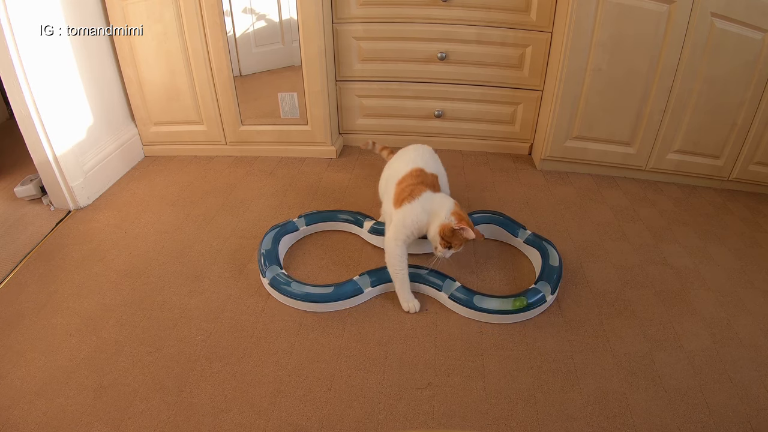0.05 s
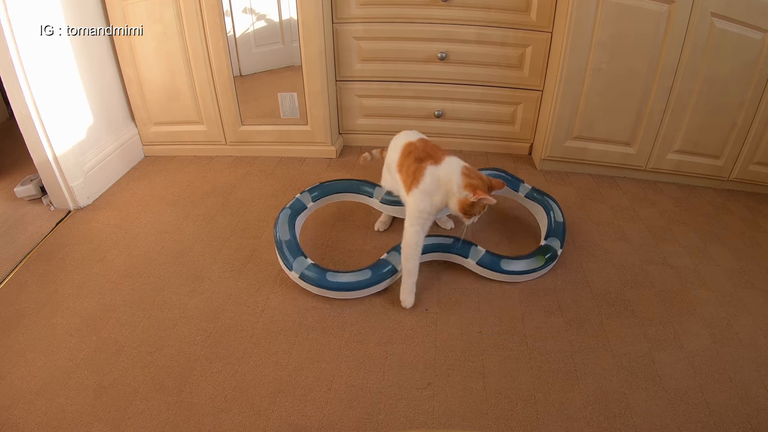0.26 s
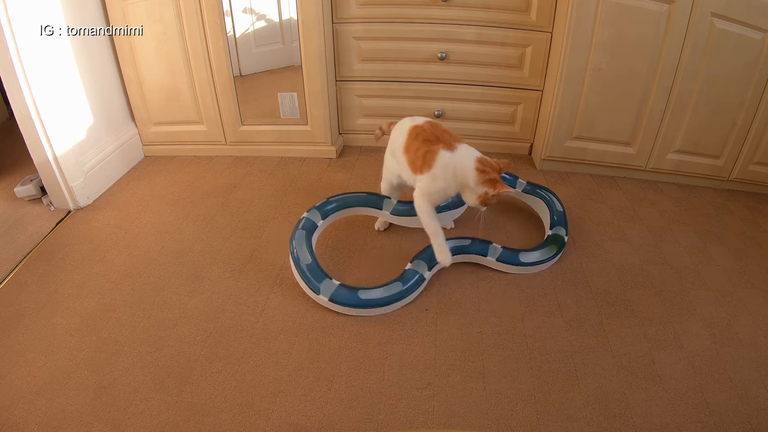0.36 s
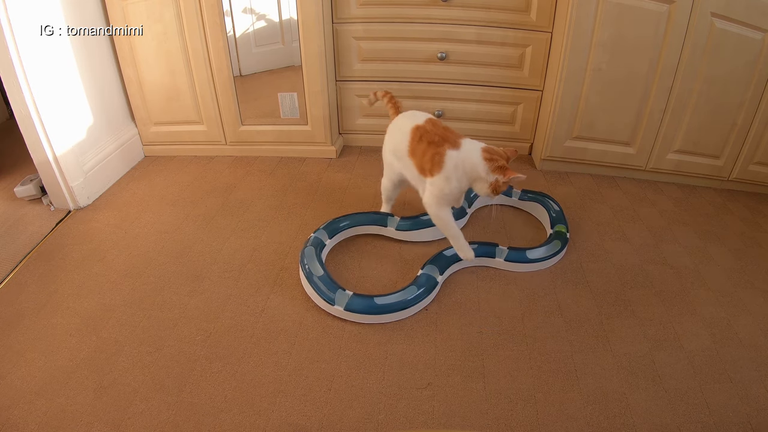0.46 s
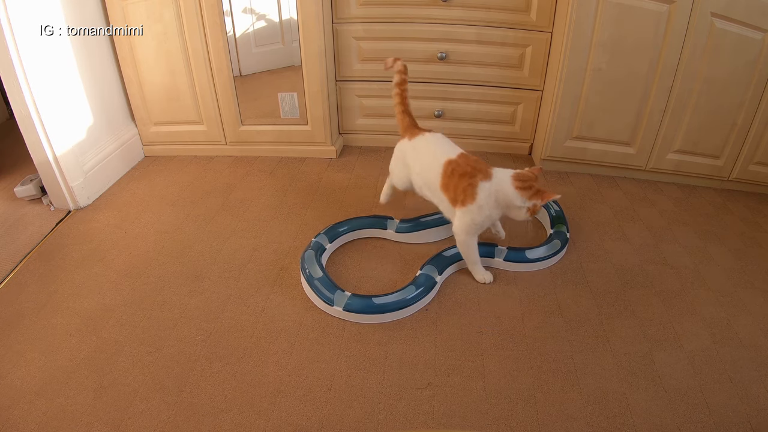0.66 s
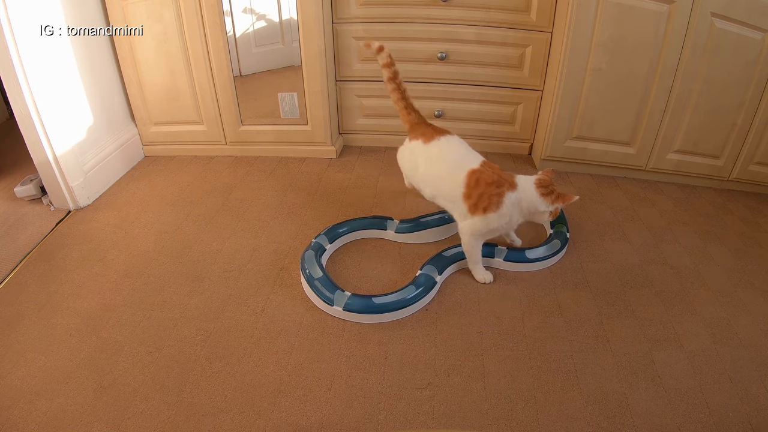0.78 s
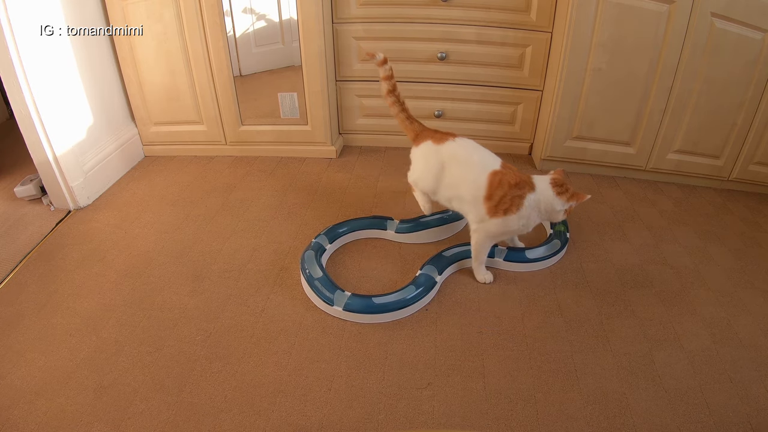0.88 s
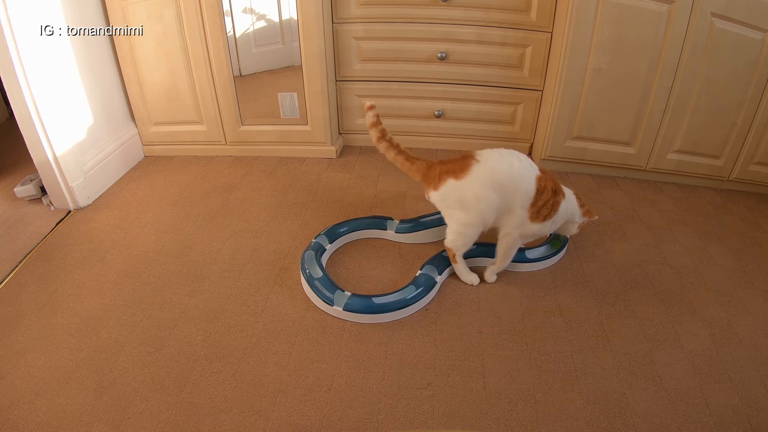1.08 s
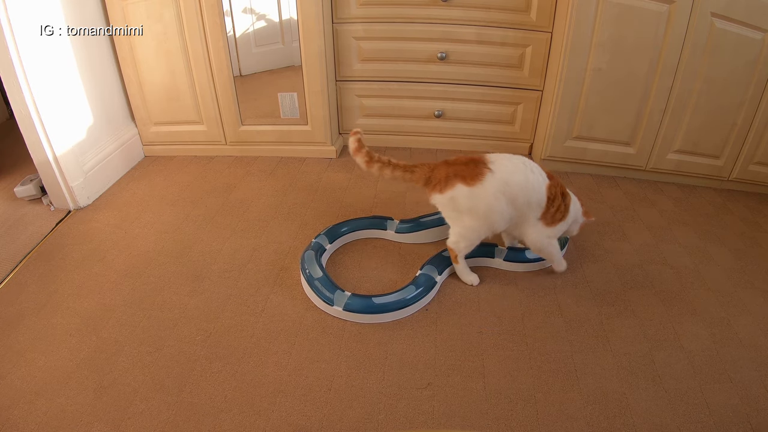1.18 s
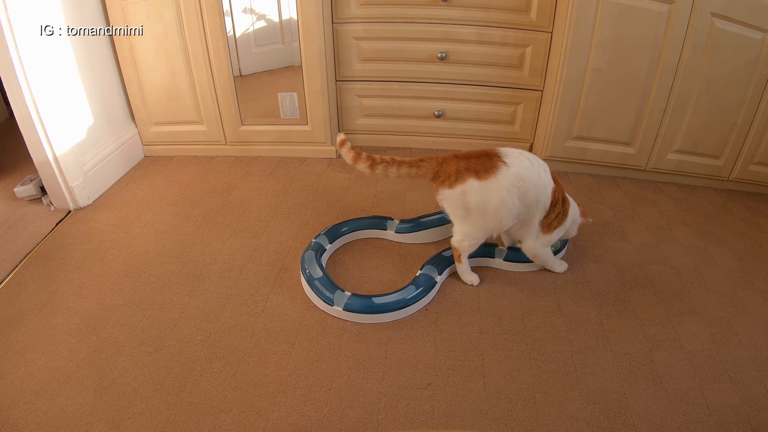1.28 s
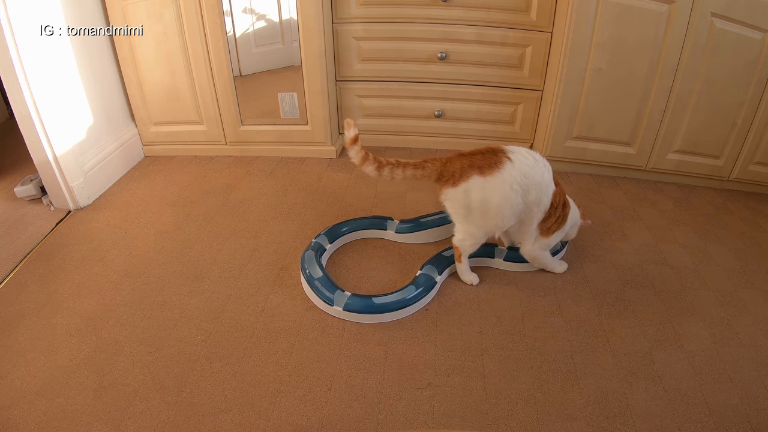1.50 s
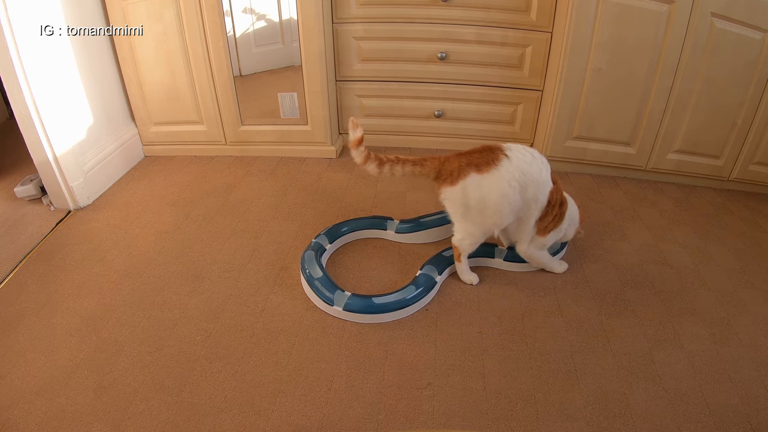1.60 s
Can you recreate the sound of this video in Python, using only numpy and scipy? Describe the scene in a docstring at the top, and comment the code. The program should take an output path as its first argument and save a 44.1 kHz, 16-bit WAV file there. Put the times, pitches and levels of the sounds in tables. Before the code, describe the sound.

A ball rattles quickly around a hollow plastic cat toy in a small carpeted room. The track knocks hard and drags with a brief low rumble, then the ball rolls on quietly with a few last ticks.

```python
"""A ball rolls and clicks in a plastic track toy as a cat paws at it on a bedroom carpet.
Tiny bumps make the rolling sound, each hit sets the plastic ringing, and the track's joints snap.
A shove gives a heavy, clattering knock, a thud in the floor and a low dragging rumble.
Then the ball rolls on softly with a few last ticks. Wardrobes and walls echo, over a faint hiss."""
import sys
import numpy as np
from scipy import signal
from scipy.fft import rfft, irfft, next_fast_len
from scipy.io import wavfile

SR = 44100
rng = np.random.default_rng(int(sys.argv[2]) if len(sys.argv) > 2 else 0)


def dump_mix(stems):
    """Bounce the given channels to the path in sys.argv[1] as a 16-bit WAV at rate SR."""
    frames = np.atleast_2d(stems).T  # one column per channel
    limited = np.clip(frames, -1, 1)  # hard clip at full scale
    pcm = np.round(limited * 32767).astype(np.int16)
    wavfile.write(sys.argv[1], SR, pcm)


N = 72765
T = np.arange(N) / SR

# How loud the ball's roll, its fine rattle and the dragged toy are. Each row: time in seconds, level in dB.
ROLL_LEVELS = [(0, -53.5), (.07, -55.5), (.15, -63.5), (.22, -50), (.33, -53), (.39, -50), (.54, -52),
               (.62, -48.5), (.84, -46), (.89, -69), (1.005, -76.5), (1.036, -58.5), (1.09, -72.5),
               (1.19, -65.5), (1.3, -79), (1.37, -65.5), (1.425, -69.5), (1.465, -65), (1.51, -71),
               (1.55, -65), (1.65, -74)]
RATTLE_LEVELS = [(0, -42), (.06, -67), (.14, -60), (.18, -56), (.335, -61.5), (.365, -48.5), (.41, -44),
                 (.54, -52.5), (.6, -47.5), (.72, -52), (.83, -47), (.88, -96), (1.01, -87), (1.038, -72),
                 (1.085, -85), (1.3, -110), (1.65, -78)]
RUMBLE_LEVELS = [(0, -87), (.38, -78), (.55, -65), (.62, -36.5), (.7, -48), (.82, -46.5), (.91, -64),
                 (1, -98)]
# The tone of those three, of hits on the track and of the hiss. Each row: frequency in Hz, gain in dB.
ROLL_TONE = [(40, -42.5), (100, -30.5), (160, -9.5), (400, -5.5), (680, -0.5), (950, -5.5), (1400, -5.5),
             (2200, -19), (4000, -32.5), (11000, -54)]
RATTLE_TONE = [(200, -34), (600, -2.5), (1200, 6), (2600, -0.5), (4500, -10), (9000, -22), (11500, -41)]
RUMBLE_TONE = [(12, -24), (28, -6.5), (44, -29), (52, -14.5), (70, -8), (110, -18), (250, -34.5),
               (1000, -82.5)]
TRACK_TONE = [(200, 0), (350, 9), (550, 0), (900, 4), (1500, 2.5), (3000, 0), (4400, -4.5), (5300, -4),
              (8000, -5.5), (10000, -12.5), (11500, -33), (16000, -21.5)]
HISS_TONE = [(30, 11.5), (90, -15.5), (170, 12.5), (700, 0), (2000, -0.5), (4000, -20.5), (9000, -24.5),
             (15000, -53.5)]
# The note of the hollow track as the ball moves. Each row: time in seconds, pitch in Hz.
HOLLOW_PITCHES = [(.04, 566), (.1, 655), (.16, 880), (1.05, 867), (1.37, 705), (1.56, 610)]
# The ball hits the track. Each row: start in seconds, level in dB, low edge in Hz, top edge in Hz,
# share sent into the room in dB.
BALL_CLICKS = [(0.0211, -45.5, 740, 2190, -11), (.188, -45, 880, 3800, -1.5),
               (0.2092, -38.5, 1230, 2300, 3.5), (0.2246, -36, 1340, 2420, -7.5),
               (0.2375, -39, 900, 2600, -0.5), (0.2871, -35, 1000, 3300, 1), (0.3769, -35, 716, 3000, -2.5),
               (0.395, -37.5, 835, 2600, -0.5), (0.4036, -43, 930, 5000, 1),
               (0.455, -46.5, 590, 3000, 13.5), (0.4623, -30.5, 600, 3840, -8.5),
               (0.473, -42, 700, 6100, 3.5), (0.5128, -36, 680, 2700, -1), (.5225, -37.5, 690, 3000, -4),
               (0.6448, -29.5, 900, 2300, 1.5), (0.675, -37.5, 610, 1950, 3.5),
               (0.693, -39.5, 1090, 2600, -12), (0.7415, -45.5, 1580, 3000, 7.5),
               (0.754, -27, 640, 3270, 0), (0.7672, -33, 494, 1470, -1), (0.8056, -36, 586, 3200, -6.5),
               (.822, -34.5, 644, 1730, -6.5), (.836, -38, 536, 1660, -6.5),
               (1.0876, -50.5, 580, 1350, 3.5), (1.1558, -49.5, 800, 900, 4), (1.5332, -56, 510, 520, -2.5)]
# The notes that track and floor ring with. Each row: pitch in Hz, level in dB, seconds to fade by 60 dB.
TRACK_NOTES = [(859, -35, 0.059), (951, -40.5, 0.09), (1219, -33, 0.052), (1412, -34.5, 0.051),
               (1596, -35, 0.035), (1898, -34, 0.052), (2337, -26.5, 0.026), (2700, -21.5, 0.015),
               (4520, -20, 0.0083)]
FLOOR_NOTES = [(64.1, -1.5, .42), (86.5, -10.5, 0.12), (146.5, 4.5, 0.13), (195.4, 0, 0.19),
               (248, -1.5, 0.14)]
# A hit takes a moment, which dulls it. Each row: multiple of its top edge, gain in dB.
HIT_DULLING = [(.6, 0), (1.15, -2.5), (1.7, -10), (3, -16), (8, -35.5)]
# The joints snap. Each row: start in seconds, level in dB, ping pitch in Hz, ping strength in dB.
JOINT_SNAPS = [(.2776, -34, 3200, -1), (.281, -40.5, 5520, 4), (.6448, -36.5, 4180, 12),
               (0.693, -45.5, 4140, 10), (0.7542, -41, 4200, 9), (1.089, -61, 3190, 14),
               (1.1483, -57, 4840, -14)]
# Weight comes down on the floor. Each row: start in seconds, level in dB, low edge in Hz.
FLOOR_THUDS = [(0.388, -43, 153), (0.563, -38, 80.3), (0.5733, -24.5, 45), (0.611, -29.5, 45),
               (0.731, -41.5, 60)]
# The sections of the shoved track slam. Each row: start in seconds, level in dB.
SHOVE_BLOWS = [(0.5614, -36), (0.5645, -27), (0.5707, -28), (0.5762, -28), (0.582, -28), (0.587, -30)]
# Echoes off wardrobes and walls. Each row: delay in seconds, left gain, right gain.
WALL_ECHOES = [(.0098, .15, 0.15), (.0118, 0.351, 0.045), (.0138, .3, 0.083)]
# How long the room rings. Each row: frequency in Hz, seconds to fade by 60 dB.
ROOM_FADES = [(150, 0.24), (800, 0.32), (2500, 0.32), (6000, 0.26), (12000, 0.21)]
# The tone of that ringing. Each row: frequency in Hz, gain in dB.
ROOM_TONE = [(100, -4), (400, -2), (1000, -1), (2500, -1), (6000, 0), (10000, 10), (13500, 4)]
# How alike its two sides are. Each row: frequency in Hz, likeness from -1 (opposite) to 1 (the same).
ROOM_ALIKE = [(100, 0.25), (300, 1), (600, 0.28), (2500, 0.37), (5000, 0.56), (8000, -0.37)]


def from_db(db):
    """Turn decibels into a gain to multiply by."""
    return 10 ** (np.asarray(db) / 20)


def rms_one(x):
    """Scale a sound so its average strength (rms) is 1."""
    return x / np.sqrt(np.mean(x ** 2) + 1e-20)


def at_hz(points, hz):
    """Read between a table's rows, giving each octave equal space."""
    f, v = np.transpose(points)
    return np.interp(np.log(np.maximum(hz, 1)), np.log(f), v)


def level(rows):
    """Turn a table of levels into a gain over time."""
    return from_db(np.interp(T, *np.transpose(rows)))


def pan(db):
    """Left and right gains; below zero leans right."""
    return from_db([[db], [-db]])


def colour(x, tone):
    """Give a sound a tone, with no ringing ahead of a hit (a minimum-phase filter)."""
    size = 2 * next_fast_len(x.shape[-1] + SR // 10)
    gains = from_db(at_hz(tone, np.linspace(0, SR / 2, size // 2 + 1)))
    cepstrum = irfft(np.log(gains))
    cepstrum[1:size // 2] *= 2
    cepstrum[size // 2 + 1:] = 0
    return irfft(rfft(x, size) * np.exp(rfft(cepstrum)))[..., :x.shape[-1]]


def add(out, s, sound):
    """Mix a sound in, starting at s seconds."""
    start = max(int(s * SR), 0)
    out[start:start + len(sound)] += sound[:N - start]


def stereo_noise(tone):
    """Noise with the given tone, unrelated left and right."""
    return rms_one(colour(rng.standard_normal((2, N)), tone))


def rolling(levels, tone, bumps_per_s, spread_db, surge_db=2.25, surges_per_s=70):
    """The ball runs unevenly over tiny bumps in the track."""
    sizes = from_db(spread_db * np.minimum(rng.exponential(1, N), 4)) * rng.choice([-1, 1], N)
    bumps = sizes * (rng.random(N) < bumps_per_s / SR)
    surge = from_db(surge_db * np.interp(T * surges_per_s, np.arange(N), rng.standard_normal(N)))
    return level(levels) * rms_one(colour(bumps * surge, tone))


def hollow(x, width_hz=67, strength_db=3.5):
    """The hollow track adds a note that slides with the ball's place."""
    pitch_hz = np.interp(T, *np.transpose(HOLLOW_PITCHES))
    turn = np.exp(2j * np.pi * np.cumsum(pitch_hz) / SR)
    decay = np.exp(-np.pi * width_hz / SR)
    note = turn * signal.lfilter([1 - decay], [1, -decay], x / turn)   # keeps what is near the pitch
    return x + from_db(strength_db) * 2 * np.real(note)


def ring(notes, t):
    """A struck object rings with a few pure, fading notes."""
    return sum(from_db(db - 60 * t / fade_s) * np.sin(2 * np.pi * hz * t) for hz, db, fade_s in notes)


def crack(t, fade_s, spike_db=-15.5):
    """A spike and countless short notes of the plastic blur into one burst."""
    fade = from_db(-60 * t / fade_s)
    burst = (t == 0) * from_db(spike_db) + rng.standard_normal(len(t)) * fade / np.linalg.norm(fade)
    for _ in range(4):   # even out the tone while keeping the burst short
        spectrum = rfft(burst)
        burst = irfft(spectrum / (np.abs(spectrum) + 1e-9), len(t)) * (t < fade_s)
    return burst / np.linalg.norm(burst)


def track_hit(low_hz, top_hz, extra_notes=(), crack_s=0.02, crack_db=10.5):
    """One blow makes the track crack and ring, a little differently each time."""
    t = T[:SR // 8]
    notes = [(hz, db + 2 * rng.standard_normal(), fade_s) for hz, db, fade_s in TRACK_NOTES]
    blow = from_db(crack_db) * crack(t, crack_s) + ring(notes + list(extra_notes), t)
    blow = signal.sosfilt(signal.butter(3, low_hz, "high", fs=SR, output="sos"), blow)
    blow = colour(blow, [(multiple * top_hz, db) for multiple, db in HIT_DULLING])
    blow = colour(blow, TRACK_TONE)
    return blow / np.sqrt(np.mean(blow[:SR // 200] ** 2))   # strength 1 over the first 5 ms


def ball_clicks():
    """The ball strikes the track. Gives the direct sound and the part sent into the room."""
    direct, sent = np.zeros((2, N))
    for s, db, low_hz, top_hz, room_db in BALL_CLICKS:
        click = track_hit(low_hz, top_hz)
        add(direct, s, from_db(db) * click)
        add(sent, s, from_db(db + room_db) * click)
    return direct, sent


def joint_snaps(ping_fade_s=.0055):
    """Joints between track sections snap, each with a short, high ping."""
    out = np.zeros(N)
    for s, db, ping_hz, ping_db in JOINT_SNAPS:
        ping = (ping_hz, ping_db, ping_fade_s)
        add(out, s, from_db(db) * track_hit(low_hz=3000, top_hz=6830, extra_notes=[ping]))
    return out


def floor_thuds():
    """The carpeted floor booms under the weight; a light step has less bass."""
    out = np.zeros(N)
    boom = ring(FLOOR_NOTES, T[:SR // 2])
    for s, db, low_hz in FLOOR_THUDS:
        thud = signal.sosfilt(signal.butter(2, low_hz, "high", fs=SR, output="sos"), boom)
        add(out, s, -from_db(db) * thud / np.abs(thud).max())
    return out


def shove_knock(flex_hz=1574, flex_db=-17, flex_fade_s=0.027):
    """Quick, heavy blows flex the track wall, each section at its own pitch."""
    out = np.zeros(N)
    for s, db in SHOVE_BLOWS:
        flex = (flex_hz * (1 + .04 * rng.standard_normal()), flex_db, flex_fade_s)
        blow = track_hit(low_hz=345, top_hz=3430, extra_notes=[flex], crack_s=0.031)
        add(out, s, from_db(db) * blow)
    return out


def drag_rumble():
    """The toy rumbles low while it is dragged, toward the right."""
    return level(RUMBLE_LEVELS) * stereo_noise(RUMBLE_TONE) * pan(db=-3)


def room(x, build_s=0.0052):
    """Wardrobes and walls give a few hard echoes and a wash that fades band by band."""
    t = T[:SR // 2]
    hz = np.linspace(0, SR / 2, len(t) // 2 + 1)
    noise, tail = rfft(rng.standard_normal((2, len(t)))), 0
    build = 1 - np.exp(-(t / build_s) ** 2)
    edges_hz = np.geomspace(80, 16000, 19)
    for low, high in zip(edges_hz, edges_hz[1:]):
        centre = np.sqrt(low * high)
        fade = from_db(-60 * t / at_hz(ROOM_FADES, centre))
        bands = irfft(noise * ((hz >= low) & (hz < high)), len(t)) * fade * build
        mid, side = bands / np.linalg.norm(bands, axis=1, keepdims=True) * np.sqrt((high - low) / SR)
        alike = np.clip(at_hz(ROOM_ALIKE, centre), -1, 1)
        left_right = np.sqrt(1 + alike) * mid + np.sqrt(1 - alike) * side * [[1], [-1]]
        tail = tail + from_db(at_hz(ROOM_TONE, centre)) * left_right
    for delay, left, right in WALL_ECHOES:
        tail[:, int(delay * SR)] += (left, right)
    return signal.fftconvolve(x[None], tail, axes=1)[:, :N]


def moving_room(x, change_s=.1):
    """As ball and toy move about, one wash of echoes blends into the next."""
    out = np.zeros((2, N))
    for s in np.arange(0, T[-1] + change_s / 2, change_s):
        blend = np.sqrt(np.maximum(1 - np.abs(T - s) / change_s, 0))
        out += room(x * blend)
    return out


def scene():
    """Mix the toy, a little to the right, with the floor, the room and a faint hiss."""
    clicks, clicks_to_room = ball_clicks()
    snaps = joint_snaps()
    roll = hollow(rolling(ROLL_LEVELS, ROLL_TONE, bumps_per_s=3500, spread_db=0.5))
    rattle = rolling(RATTLE_LEVELS, RATTLE_TONE, bumps_per_s=1600, spread_db=1.5)   # when it runs fast
    toy = shove_knock() + roll + rattle
    rumble = drag_rumble()
    hiss = from_db(-77.5) * stereo_noise(HISS_TONE)
    direct = (clicks + snaps + toy + floor_thuds()) * pan(db=-1)
    echoes = moving_room(clicks_to_room + from_db(-2) * snaps + toy) * pan(db=-0.74)
    return direct + echoes + rumble + hiss


def record(dry):
    """Cut the treble steeply above 15400 Hz."""
    return signal.sosfilt(signal.ellip(10, .1, 80, 15400, fs=SR, output="sos"), dry)


dry = scene()
out = record(dry)
dump_mix(out)
```